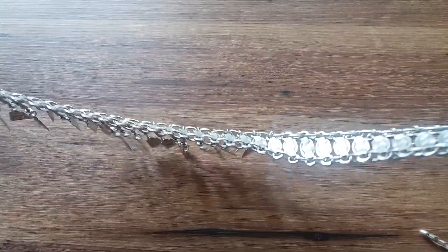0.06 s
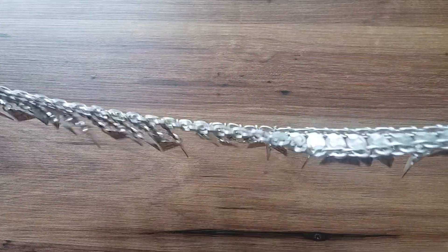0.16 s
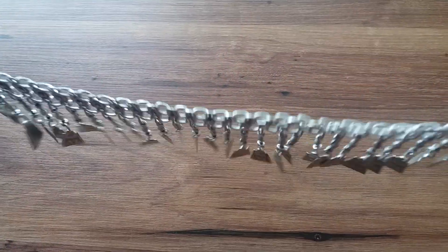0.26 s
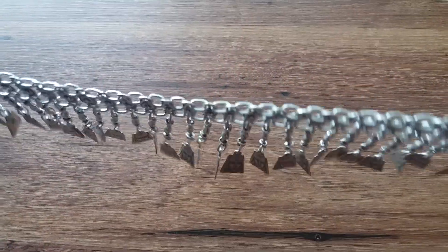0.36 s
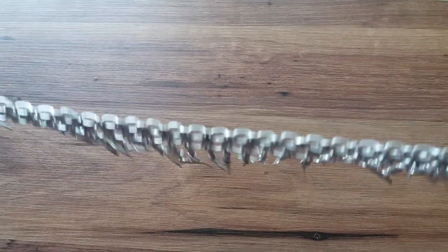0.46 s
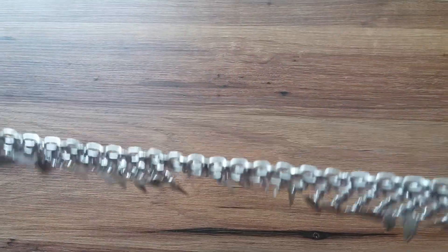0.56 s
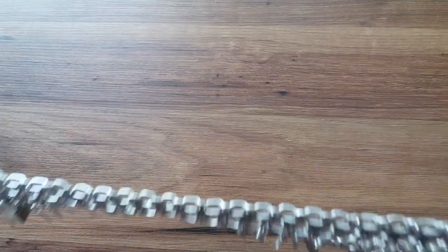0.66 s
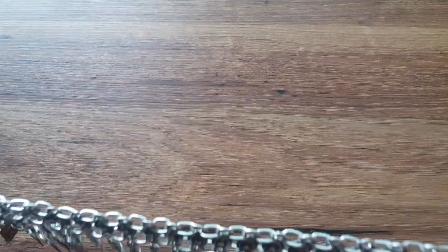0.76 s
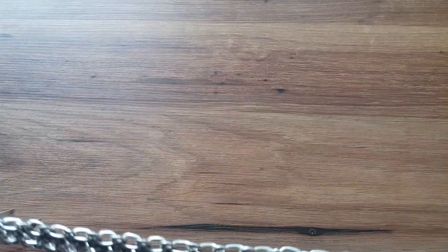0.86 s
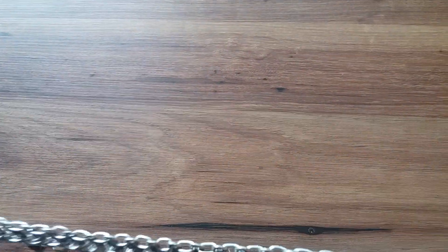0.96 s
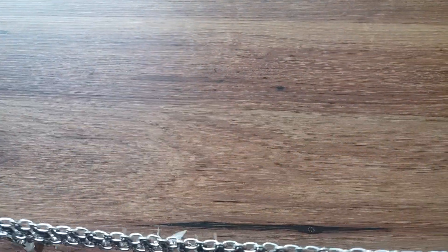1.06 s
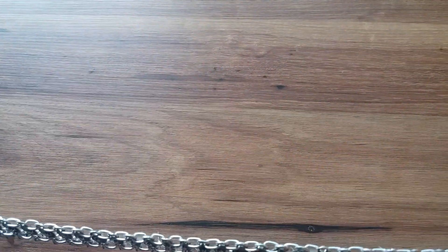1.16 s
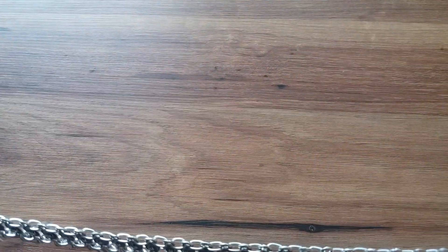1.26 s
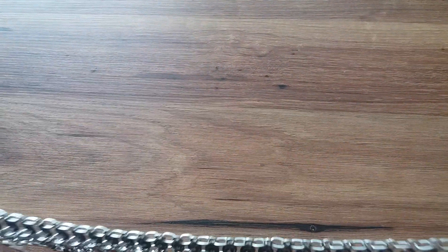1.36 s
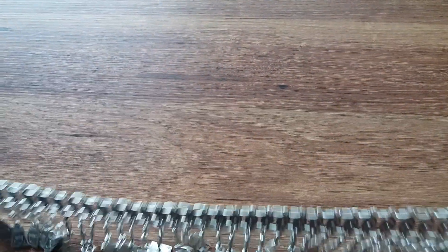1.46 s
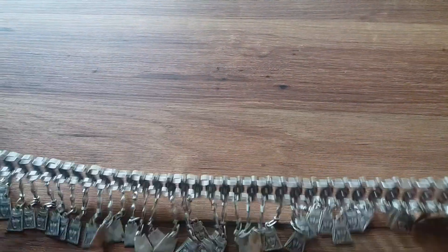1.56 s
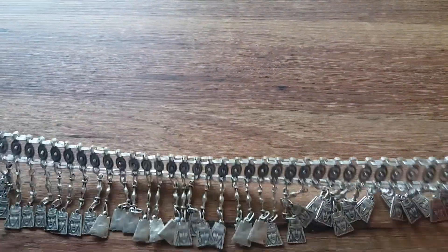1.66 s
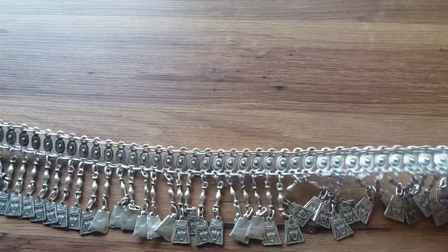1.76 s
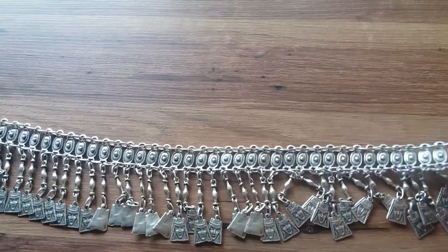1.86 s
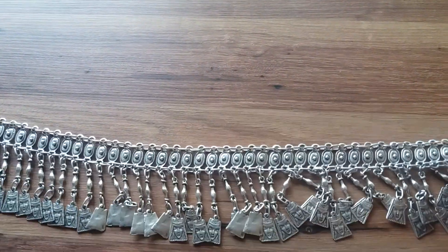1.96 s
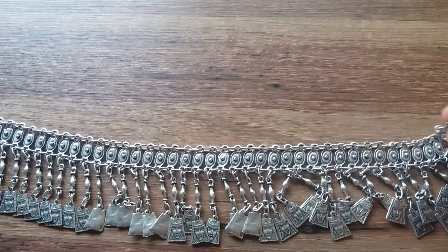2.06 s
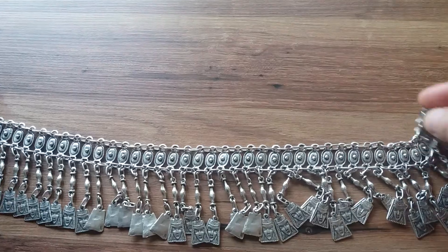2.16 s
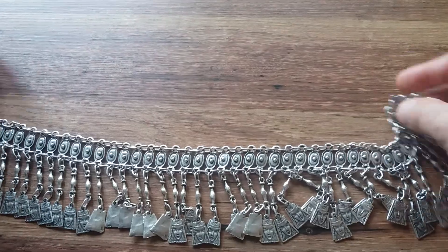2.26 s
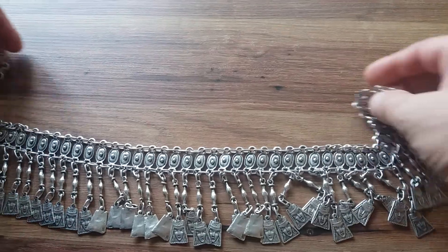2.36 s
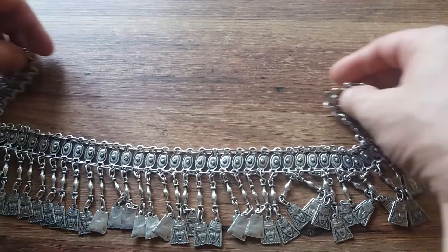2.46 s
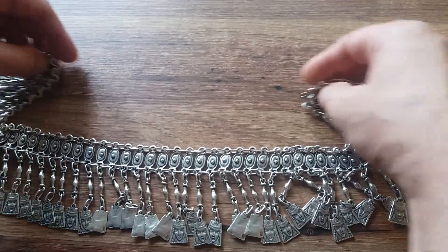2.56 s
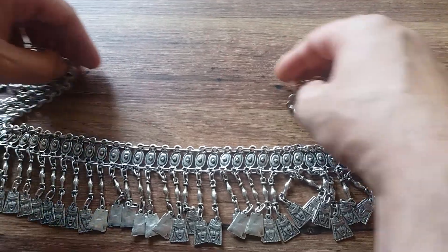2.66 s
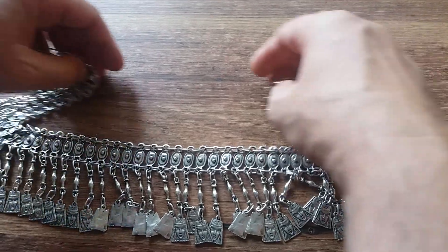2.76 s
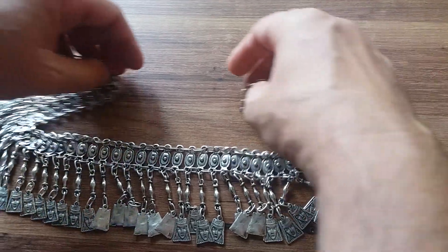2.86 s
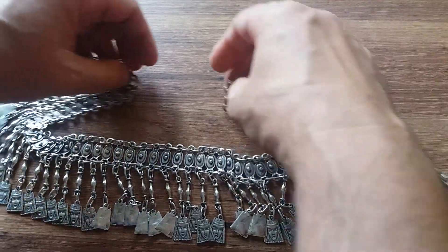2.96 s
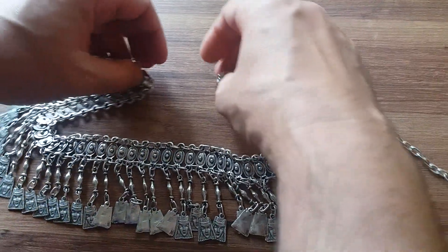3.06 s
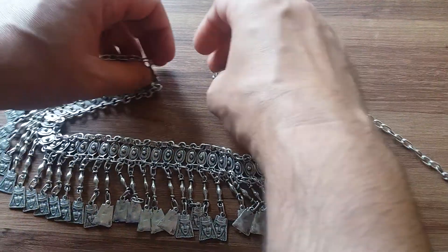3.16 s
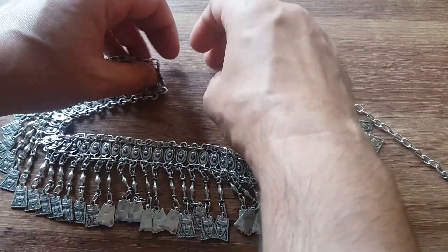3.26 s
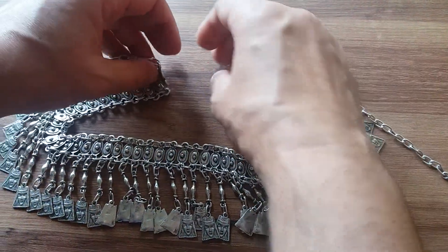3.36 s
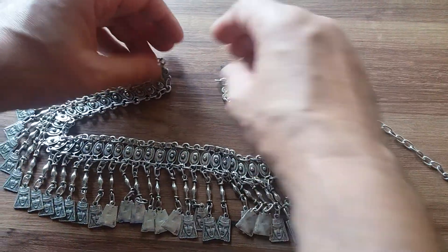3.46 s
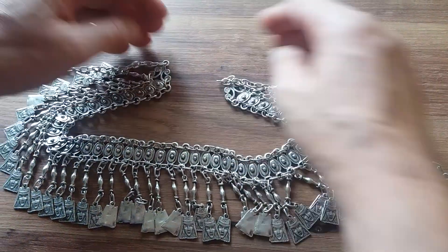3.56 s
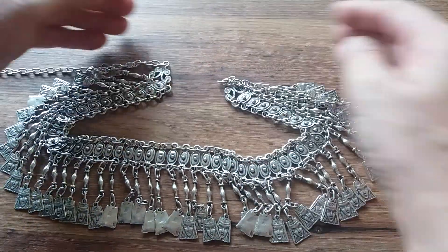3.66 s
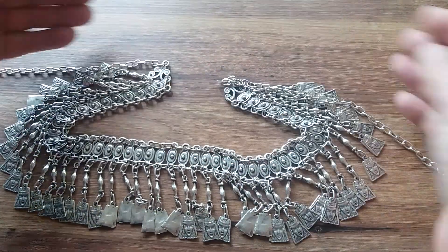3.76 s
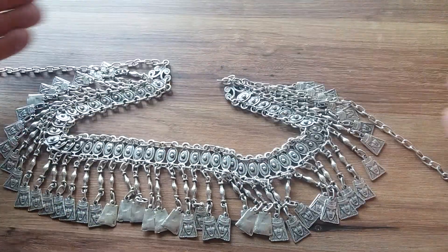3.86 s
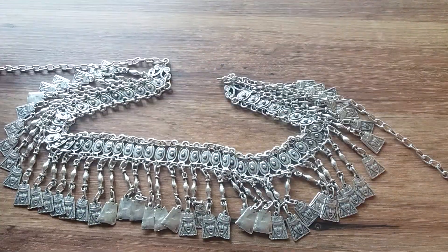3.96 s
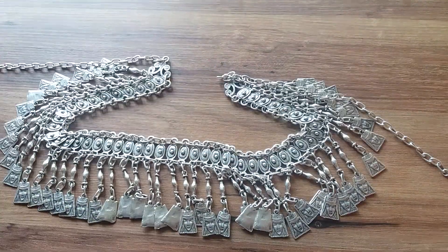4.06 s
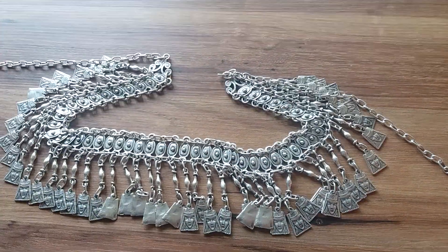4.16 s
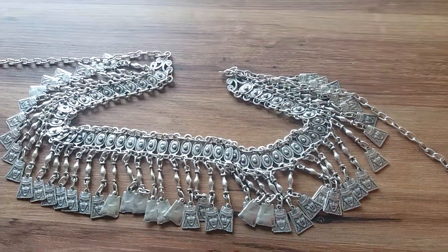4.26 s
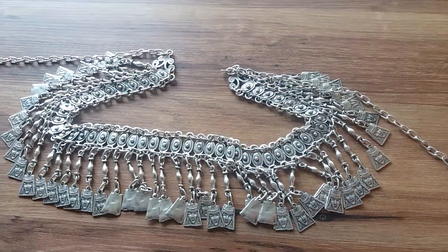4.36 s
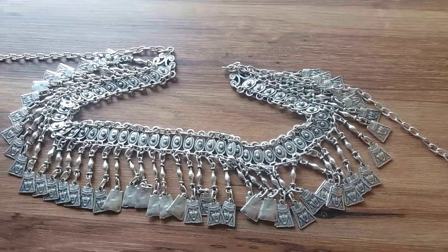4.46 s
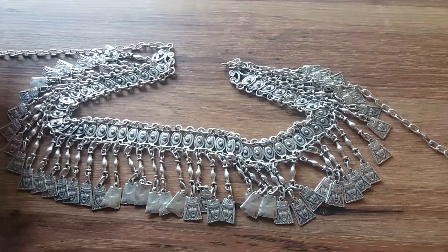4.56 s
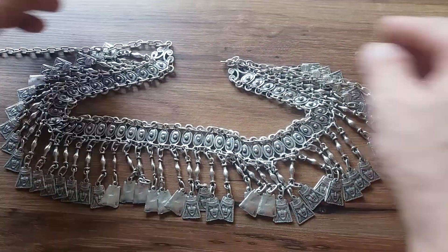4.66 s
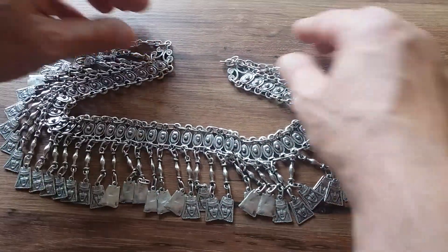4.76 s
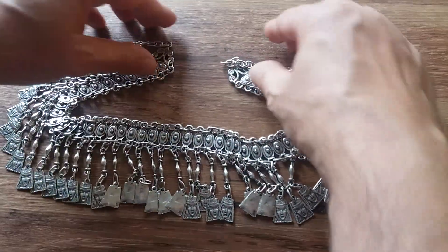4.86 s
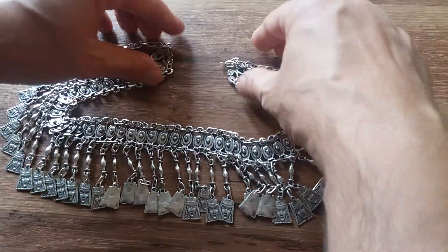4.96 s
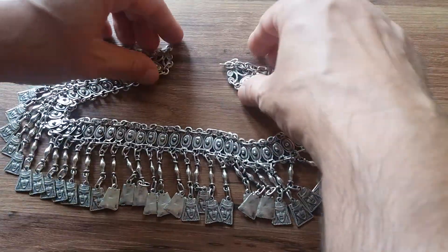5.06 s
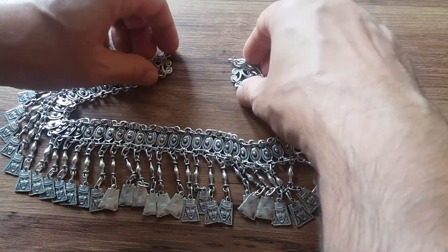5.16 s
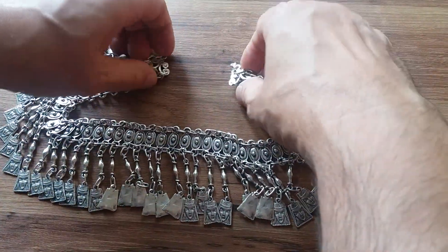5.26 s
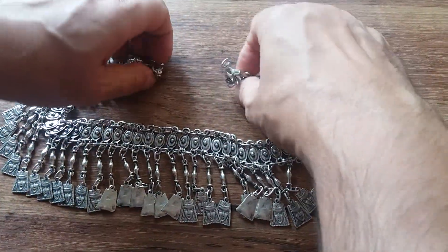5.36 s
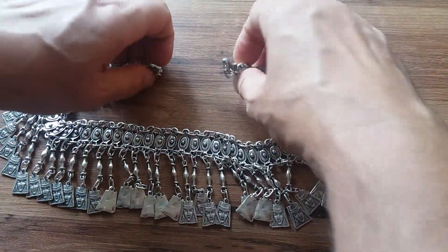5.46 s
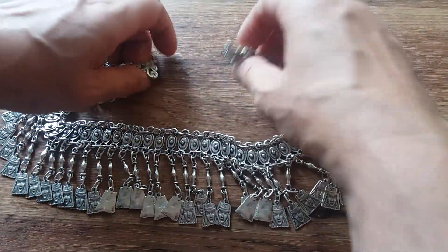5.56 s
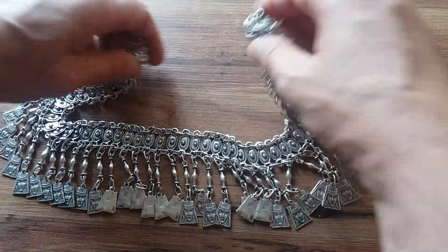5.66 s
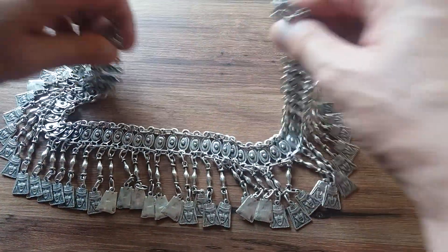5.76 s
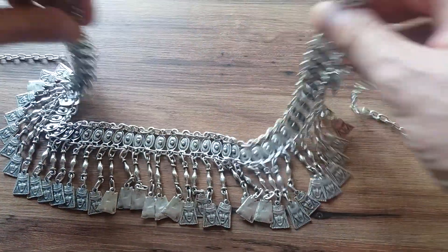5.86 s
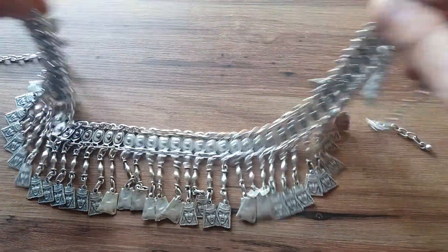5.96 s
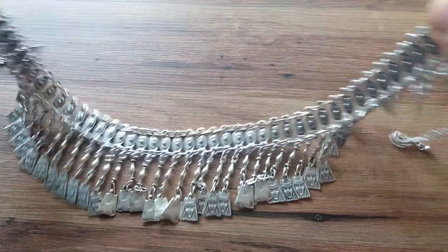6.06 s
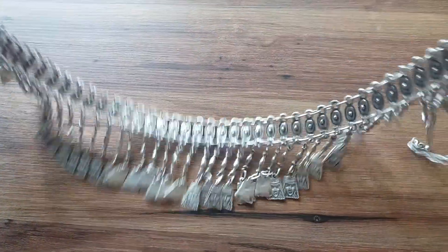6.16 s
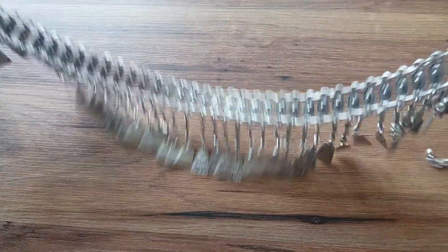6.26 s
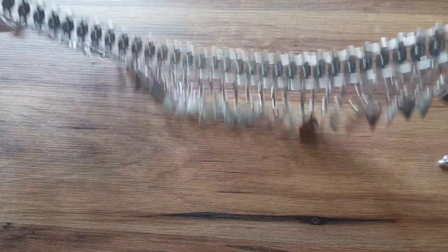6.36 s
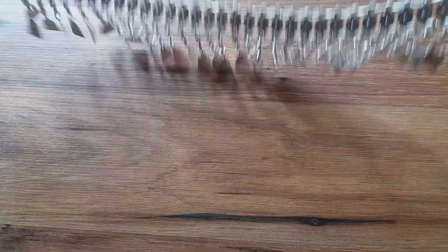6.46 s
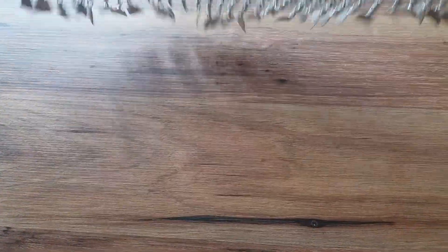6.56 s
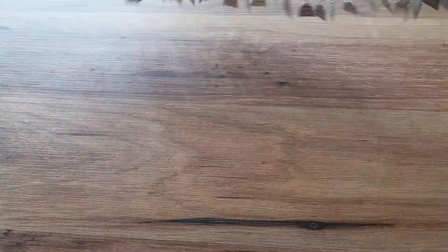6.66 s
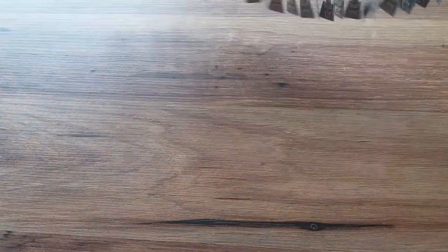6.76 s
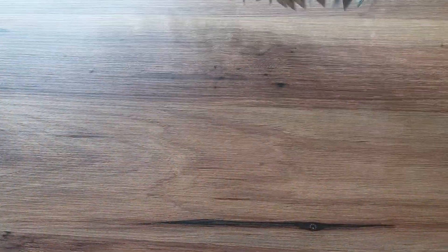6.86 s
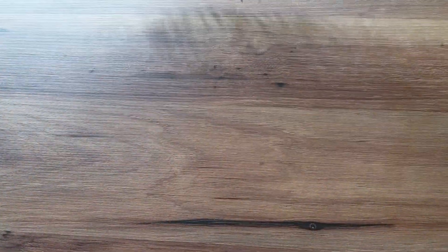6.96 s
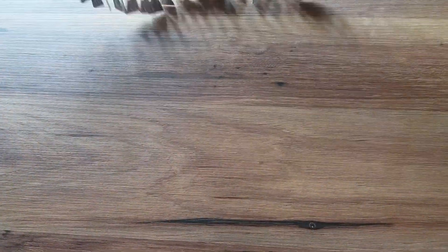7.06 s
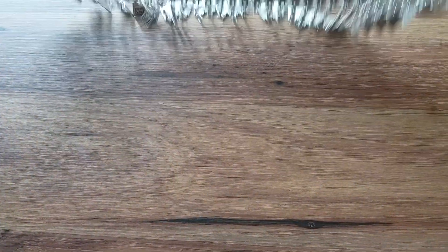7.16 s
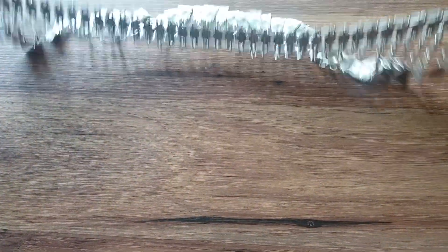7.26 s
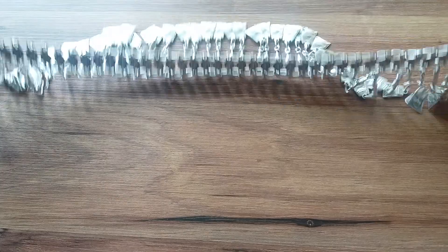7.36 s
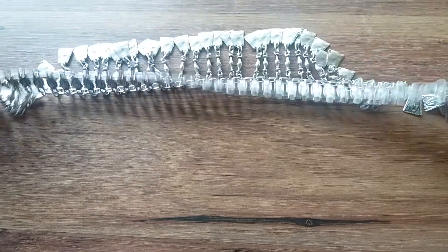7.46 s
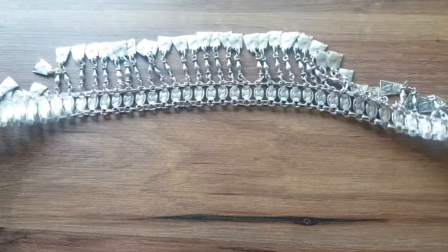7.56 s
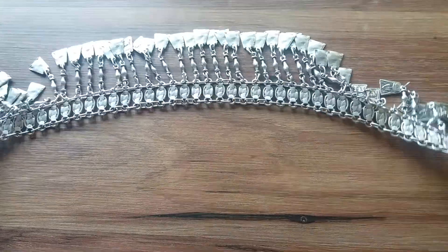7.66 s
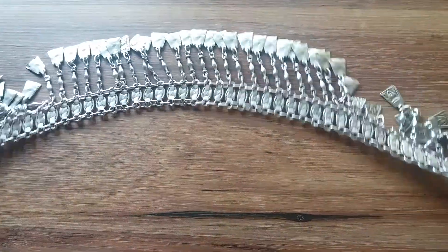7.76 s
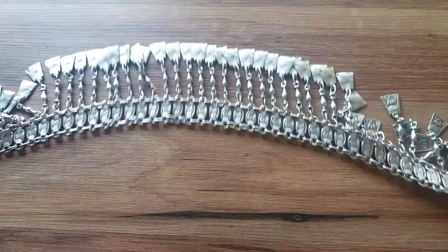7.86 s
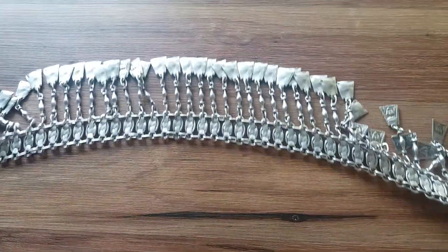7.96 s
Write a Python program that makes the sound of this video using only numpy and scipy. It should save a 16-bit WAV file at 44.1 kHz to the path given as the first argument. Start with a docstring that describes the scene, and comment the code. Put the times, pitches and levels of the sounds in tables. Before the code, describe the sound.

A quiet room with low distant traffic rumble and a faint wavering low hum; metal sounds are close and dry, with a short diffuse room tail. A brief light rattle opens, with thin high charm pings up to 0.8 s; a chain whirrs softly from 0.5 s and slows to separate ticks and small clacks around 1.0 s. At 1.5 s the belt lands with a hard clack and a dense bright jingle, renewed near 1.9 and 2.0 s, fading with dull table knocks. Softer shuffling swells from 2.5 to 3.7 s, with clacks near 2.9, 3.3 and 3.6. Near quiet until 5.0, then small clinks, a soft dull scuff at 5.75, and a jingle rising to 6.4. Quick chain ticks run 6.7-7.05 s. A heavy end lands at 7.1 with a hollow rattle, and crowded loud clacks and clatter continue from 7.3, easing slightly by 8.0.

```python
"""Dense showers of tiny dry clicks, brief very high ringing, hard clacks and a run of chain ticks in a quiet room:
a metal belt hung with small charms is lowered, folded, lifted and dropped on a wooden table.
Links, charms and chain are damped sines, or pulses and chance contacts through the resonances of wood and metal.
The room rumbles with distant traffic (shaped noise), hums (a wavering sine) and answers with diffuse tails."""
import sys
import numpy as np
from scipy import signal
from scipy.fft import rfft, irfft, next_fast_len
from scipy.io import wavfile
from scipy.ndimage import map_coordinates

SR = 44100
rng = np.random.default_rng(int(sys.argv[2]) if len(sys.argv) > 2 else 0)


def waveform_to_disk(signal):
    """Save audio, clipped to [-1, 1], as 16-bit WAV at the path in sys.argv[1]."""
    frames = np.transpose(np.atleast_2d(signal))
    scaled = np.clip(frames, -1, 1) * 32767
    samples = np.round(scaled).astype(np.int16)
    wavfile.write(sys.argv[1], SR, samples)


N = 353682
TIME_S = np.arange(N) / SR

# colour of metal on wood at the microphone: [f/Hz, relative level/dB]
WOOD_COLOUR = [(1500, -30.5), (2250, -11.5), (2750, -2.5), (3150, 3), (3650, -0.5), (4600, -1.5),
               (5600, -5.5), (6800, -15.5), (8600, -24), (11500, -31.5), (15800, -45)]
# hollow tones of the table top: [f/Hz, width/Hz, relative level/dB]
TABLE_MODES = [(1795, 580, 0), (2280, 300, 0)]


def amp(db):
    """Amplitude factor of a level in dB."""
    return 10 ** (np.asarray(db) / 20)


def unit(x):
    """x scaled to rms 1."""
    return x / np.sqrt(np.mean(x ** 2) + 1e-20)


def along(points, hz):
    """(Hz, value) points interpolated on a log frequency axis."""
    point_hz, value = np.transpose(points)
    return np.interp(np.log(hz + 1), np.log(point_hz + 1), value)


def curves(rows):
    """One value per sample for each column after the time."""
    s, *columns = np.transpose(rows)
    return [np.interp(TIME_S, s, column) for column in columns]


def wobble(rate_hz):
    """Smooth random curve, rate_hz knots a second."""
    knots = rng.standard_normal(int(N * rate_hz / SR) + 4)
    return map_coordinates(knots, [np.arange(N) * rate_hz / SR])


def filtered(x, response):
    """x times a response (real or complex) of frequency in Hz."""
    size = next_fast_len(N + SR // 2)
    return irfft(rfft(x, size) * response(np.fft.rfftfreq(size, 1 / SR)), size)[:N]


def causal(points):
    """Minimum-phase response with these (Hz, dB) gains: it starts at the blow."""
    def response(hz):
        cepstrum = irfft(np.log(amp(along(points, hz))))
        half = len(cepstrum) // 2
        cepstrum[1:half] *= 2
        cepstrum[half + 1:] = 0
        return np.exp(rfft(cepstrum))
    return response


def modes(table):
    """Sum of (Hz, width Hz, dB) resonances with steep skirts."""
    def response(f):
        return sum(amp(db) * (1j * f * width / (hz * hz - f * f + 1j * f * width)) ** 2
                   for hz, width, db in table)
    return response


def impulse():
    """One unit sample near the start, for finding the peak of a response."""
    return np.arange(N) == 99


def taps(s, size):
    """Single-sample pushes."""
    return np.bincount((s * SR).astype(int), size, N)[:N]


def rings(s, gain, hz, t60_s, rise_s, size, hold_s=0):
    """One damped sine per start time, size samples long; it may hold before it dies."""
    k = np.arange(size)
    t = k / SR
    decay = amp(-60 * np.maximum(t - hold_s, 0) / t60_s[:, None])
    attack = 1 - np.exp(-t / rise_s)
    wave = gain[:, None] * np.sin(2 * np.pi * hz[:, None] * t) * decay * attack
    at = (np.round(s * SR).astype(int)[:, None] + k).ravel()
    return np.bincount(at, wave.ravel(), N + size)[:N]


def contacts(s, gain, cycles, count):
    """Each contact sets count chance modes going together; wood and microphone colour them."""
    u = rng.random((len(s), count, 2))
    hz = 1500 * 10 ** u[..., 0]
    # modes even in octaves lasting a set number of cycles: size grows with pitch for an even spectrum
    size = gain[:, None] * amp(5 * u[..., 1]) * hz / 4000
    t60_s = cycles / hz
    raw = rings(np.repeat(s, count), size.ravel(), hz.ravel(), t60_s.ravel(), rise_s=5e-5, size=180)
    return filtered(raw, causal(WOOD_COLOUR))


def snaps(s, db, soft_hz):
    """Hard blows at a set peak: a push through metal-on-wood colour, rounded by the contact time."""
    def colour(hz):
        return causal(WOOD_COLOUR)(hz) / (1 + 1j * hz / soft_hz) ** 2
    peak = np.abs(signal.hilbert(filtered(impulse(), colour)[:4096])).max()
    return filtered(taps(s + 0.00055, amp(db) / peak), colour)


def shower(count, spread_db):
    """Chance times in s and sizes of many small events."""
    s = rng.random(count) * (N - 1) / SR
    return s, amp(spread_db * np.clip(rng.standard_normal(count), -2, 2))


def dying(start_s, db, t60_s):
    """Gain that starts at once and dies exponentially."""
    t = TIME_S - start_s
    return (t > 0) * amp(db - 60 * np.abs(t) / t60_s)


def room_tone():
    """Rumble and hiss: noise with a falling spectrum and a slightly wavering level."""
    # spectrum: [f/Hz, relative level/dB]
    air_colour = [(30, -41.5), (59, -8.5), (81, -8.5), (117, -13), (149, -2.5), (203, -2), (226, -7.5),
                  (362, -12), (402, -18), (1090, -17.5), (1750, -27.5), (5120, -47), (15800, -42.5)]
    air = unit(filtered(rng.standard_normal(N), lambda f: amp(along(air_colour, f))))
    return amp(-49 + 0.1 * wobble(2.06)) * air


def hum():
    """A sine whose pitch and level waver about slow curves."""
    # course: [t/s, f/Hz, rms level/dB]
    hum_course = [(0, 198.7, -60.5), (.9, 198.5, -45), (2, 200.1, -44.5), (2.4, 203, -53.5),
                  (5.2, 199.5, -58.5), (8.02, 197.4, -52)]
    hz, db = curves(hum_course)
    level = np.sqrt(2) * amp(db + 1.4 * wobble(5.4))
    return level * np.sin(2 * np.pi * np.cumsum(hz + 3 * wobble(8)) / SR)


def effort():
    """Clatter, ring and drumming gains: moves and jolts rise, hold and die; their powers add."""
    # handling of the belt, swung, brushed, dropped, pushed, gathered and lifted:
    # [t at full strength/s, build-up/s, hold/s, dying/s, clatter/dB, charm ring/dB, table drumming/dB]
    moves = [(0.123, 0.28, 0.0057, 0.016, -35.5, -66, -53), (0.155, .05, 0.15, 0.17, -51.5, -66.5, -61),
             (0.987, 0.15, 0.0098, 0.15, -63.5, -80, -52), (0.5, .1, 0.99, 0.07, -59, -71, -65),
             (1.333, 0.018, 0.023, 0.083, -48, -83, -44), (1.486, 0.00069, 0.13, 0.46, -22, -41, -39.5),
             (2.502, 0.87, 0.06, 0.58, -33, -67.5, -49.5), (2.918, 0.26, 0.078, 0.4, -33.5, -69, -49.5),
             (5.56, 0.34, 0.46, 0.53, -40.5, -78, -49), (6.363, 0.46, .17, 0.024, -28, -49, -41),
             (6.597, 0.056, 0.43, 0.11, -50.5, -64.5, -61), (7.121, .002, 0.04, 0.68, -25, -62, -33),
             (7.333, 0.18, 0.18, 0.22, -23.5, -46, -69.5), (7.932, 0.47, 0.016, 0.37, -29.5, -57.5, -46)]
    # short shakes as fingers nudge the links: [t at full strength/s, build-up/s, clatter/dB, charm ring/dB]
    nudges = [(1.62, .04, -25.5, -43.5), (1.919, 0.072, -23.5, -45), (2.02, 0.04, -28, -64),
              (3.262, 0.008, -37, -66), (3.303, 0.012, -40, -64), (3.452, 0.011, -38, -67),
              (3.61, 0.026, -33, -54.5), (5.086, 0.056, -38.5, -74), (5.201, 0.066, -36.5, -75),
              (5.281, 0.026, -39, -77), (5.35, 0.019, -41.5, -79), (5.405, 0.013, -31.5, -49.5),
              (7.39, .01, -22, -55), (7.49, 0.03, -25.5, -57), (7.611, 0.052, -24.5, -41)]
    hold_s, dying_s, drum_db = 0.0048, 0.091, -22  # of each nudge; drumming relative to its clatter
    step_db = 20  # lost one build-up time before, or one dying time after, full strength
    jolts = [(s, build, hold_s, dying_s, db, ring, db + drum_db) for s, build, db, ring in nudges]
    s, build, hold, fade, *levels = np.array(moves + jolts).T[..., None]
    t = np.arange(0, N / SR + .002, .0005)
    before = (np.maximum(s - t, 0) / build) ** 2
    after = np.maximum(t - s - hold, 0) / fade
    shape_db = -step_db * (before + after)
    gains = [np.sqrt((amp(db + shape_db) ** 2).sum(axis=0)) for db in levels]
    return [np.interp(TIME_S, t, gain) for gain in gains]


def link_clatter():
    """Dense chance contacts of links on wood, rms 1."""
    s, size = shower(count=26000, spread_db=4.2)
    return unit(contacts(s, size, cycles=33.0, count=2))


def strikes():
    """Sparse chance blows of whole charms on wood, brighter than the links, rms 1."""
    s, size = shower(count=700, spread_db=0.5)
    blows = contacts(s, size, cycles=20.5, count=8)
    return unit(filtered(blows, lambda hz: 1j * hz / (1j * hz + 6000)))


def charm_ring():
    """Flat charms ring briefly at pitches scattered about a few mode families, rms 1."""
    # mode families: [f/Hz, spread to either side/Hz, relative level/dB]
    charm_modes = [(11000, 290, -0.5), (13300, 300, 3.5), (14270, 350, 3.5), (15230, 310, -1.5)]
    s, size = shower(count=5000, spread_db=5.5)
    u = rng.random((len(s), 2))
    family = (u[:, 0] * len(charm_modes)).astype(int)
    hz, spread_hz, db = np.array(charm_modes)[family].T
    pitch_hz = hz + spread_hz * (2 * u[:, 1] - 1)
    return unit(rings(s, size * amp(db), pitch_hz, np.full(len(s), 0.016), rise_s=3e-4, size=750))


def table_hollow(pushes):
    """Chance pushes excite the table-top modes; further back only the upper one sounds."""
    further_back_s = (5, 6.6)  # the folded belt lies further back
    front = unit(filtered(pushes, modes(TABLE_MODES)))
    back = unit(filtered(pushes, modes(TABLE_MODES[1:])))
    return np.where(np.digitize(TIME_S, further_back_s) == 1, back, front)


def buckle(pushes):
    """The heavy end lands and rattles out: pushes through one dying resonance."""
    rattle = unit(filtered(pushes, modes([(1523.5, 118.5, 0)])))  # f/Hz, width/Hz, dB
    return dying(7.118, db=-29.5, t60_s=0.67) * rattle


def belt():
    """Links, charms and table sound together as the handling drives them."""
    clump_db = 0.61 * wobble(30)  # links move in clumps
    s, size = shower(count=6000, spread_db=4.5)
    pushes = taps(s, size * rng.choice([-1, 1], len(s)))
    rattling, swinging, drumming = effort()
    hard = amp(-4.5) * (rattling / rattling.max()) ** .6  # harder handling, more pronounced strikes
    clatter = rattling * (link_clatter() + hard * strikes())
    hollow = drumming * table_hollow(pushes)
    return amp(clump_db) * (clatter + swinging * charm_ring() + hollow + buckle(pushes))


def pings():
    """A charm struck in the air: a quick first drop, then a thin long ring."""
    # single charms: [t/s, level/dB, f/Hz]
    charm_hits = [(0.1251, -46, 11300), (0.391, -37.5, 11000), (0.5698, -43, 10900), (0.793, -53, 11160),
                  (2.008, -30.5, 10800), (6.574, -34.5, 15500), (6.6168, -41, 13300), (6.7732, -39, 14400),
                  (7.0622, -41, 14100)]
    s, db, hz = np.transpose(charm_hits)
    first = rings(s, amp(db), hz, np.full(len(s), 0.012), rise_s=0.00025, size=2000)
    tail = rings(s, amp(db - 15), hz, np.full(len(s), 0.12), rise_s=0.00018, size=9000)
    return first + tail


def chain():
    """Every link knocks the same edge: a whirr while the chain runs, single ticks as it slows."""
    # fast run: [t/s, link rate/Hz, level/dB]
    slide = [(.5, 153, -64), (.75, 144, -54), (.88, 120, -48), (.93, 88, -48)]
    # links dropping one by one over the edge: [t/s, relative level/dB]
    link_drops = [(.9341, -29), (.9521, -28), (.9726, -28), (6.6705, -33), (6.6783, -28), (6.6862, -28),
                  (6.6962, -25), (6.706, -27), (6.7137, -27), (6.7242, -26), (6.7347, -26), (6.7455, -30),
                  (6.756, -31), (6.765, -31), (6.7771, -31), (6.789, -29), (6.7995, -31), (6.809, -32),
                  (6.821, -27), (6.8384, -26), (6.8509, -26), (6.8674, -25), (6.8833, -25), (6.8973, -25),
                  (6.9153, -28), (6.926, -30), (6.9457, -29), (6.9577, -25), (6.9751, -23), (6.9951, -23),
                  (7.029, -27), (7.04, -28), (7.0494, -31)]
    # modes of the edge under the chain: [f/Hz, width/Hz, relative level/dB]
    edge_modes = [(1775, 150, -14), (2590, 130, -15), (3040, 160, 0), (3610, 180, -8), (4060, 200, -8),
                  (4540, 170, -10), (5300, 150, -19)]
    # pull on the chain, moving the edge's lower tones: [t/s, frequency factor]
    pull = [(1.25, 1.0), (6.68, 1.1), (6.77, 1.08), (6.82, 1.0)]
    rate_hz, db = curves(slide)
    links_passed = np.cumsum(rate_hz * (1 + 0.086 * wobble(90))) / SR
    run = np.diff(np.floor(links_passed), prepend=0) * amp(2.8 * rng.standard_normal(N))
    moving = np.abs(TIME_S - .7) < .25
    whirr = moving * amp(db) * unit(filtered(run, modes(edge_modes)))

    s, tick_db = np.transpose(link_drops)
    hz, _, mode_db = np.transpose(edge_modes)
    u = rng.standard_normal((len(s), len(hz), 2))
    factor = np.interp(s, *np.transpose(pull))[:, None] ** (hz < 4200)
    pitch_hz = factor * hz * (1 + .025 * u[..., 0])
    gain = amp(tick_db[:, None] + mode_db - 5 + 2.5 * u[..., 1])
    ring = rings(np.repeat(s, len(hz)), gain.ravel(), pitch_hz.ravel(), np.full(gain.size, .007),
                 rise_s=0.0003, size=600, hold_s=.0022)
    blow = snaps(s, tick_db - 14, soft_hz=9100)
    return ring + blow + whirr


def clacks():
    """Metal on wood: a hard blow, and three quick contacts whose chance modes die within some cycles."""
    # single clacks: [t/s, relative level/dB]
    clack_hits = [(1.0058, -18), (1.0253, -21), (1.0437, -26), (1.0604, -29), (1.0871, -21), (1.1071, -31),
                  (1.1764, -30), (1.1949, -36), (1.2433, -38), (1.4496, -32), (1.4863, -7), (1.8845, -12),
                  (1.9048, -8), (2.0126, -13), (2.074, -16), (2.1039, -16), (2.9041, -16), (3.2605, -9),
                  (3.2954, -21), (3.4199, -33), (3.4339, -26), (3.4553, -13), (3.4828, -20), (3.5805, -30),
                  (3.591, -16), (3.6024, -17), (3.6077, -14), (3.7302, -33), (5.0322, -31), (5.0791, -19),
                  (5.0926, -20), (5.1986, -24), (5.2709, -24), (5.3398, -23), (5.4049, -19), (5.4324, -17),
                  (5.7476, -22), (5.813, -15), (6.3081, -13), (7.2994, -9), (7.3219, -6), (7.3423, -5),
                  (7.359, -5), (7.4785, -7), (7.6766, -11), (7.3837, -7), (7.5523, -12), (7.5723, -9),
                  (7.593, -9), (7.626, -7), (7.634, -9), (7.7105, -13), (7.6027, -5), (7.6536, -8),
                  (7.698, -10), (7.886, -13), (7.919, -11)]
    s, db = np.transpose(clack_hits)
    contact_s = s[:, None] + .0045 * rng.random((len(s), 3))
    ring = contacts(contact_s.ravel(), np.repeat(amp(db - 16), 3), cycles=34, count=4)
    return snaps(s, db - 1, soft_hz=12000) + ring


def table_knocks():
    """Dull knocks: single pushes sound only the table-top modes."""
    # knocks: [t/s, peak level/dB]
    dull_hits = [(2.1268, -27), (2.4537, -24), (2.506, -32), (7.721, -25)]
    s, db = np.transpose(dull_hits)
    peak = np.abs(filtered(impulse(), modes(TABLE_MODES))).max()
    return filtered(taps(s, amp(db) / peak), modes(TABLE_MODES))


def bump():
    """A soft scuff far off: dull band-limited noise that starts at once and dies."""
    def dull(f):
        return f ** 2 / (f ** 2 + 350 ** 2) / (1 + (f / 2400) ** 4)
    return dying(5.758, db=-40.5, t60_s=0.56) * unit(filtered(rng.standard_normal(N), dull))


def walls(x, t60_s, count=7):
    """Short diffuse room answer: pieces sound from ever other places, so the noise tail varies."""
    t = np.arange(SR // 4) / SR
    tails = rng.standard_normal((count, len(t))) * amp(-60 * t / t60_s) * (t > .002)
    place = np.repeat(rng.integers(count, size=N // 400 + 1), 400)[:N]  # redrawn every 400 samples
    parts = x * (place == np.arange(count)[:, None])
    wet = signal.fftconvolve(parts, tails / np.linalg.norm(tails[0]), axes=1).sum(axis=0)[:N]
    return filtered(wet, lambda hz: hz > 1100)  # small metal pieces put no bass into the room


def scene():
    """Belt, charms and chain with their room answer, over the sounds of the room."""
    ticks = chain()
    metal = belt() + pings() + clacks() + table_knocks()
    # the chain is closer to the microphone, so it gets less of the room
    wet = amp(-7.5) * walls(metal + amp(-4) * ticks, t60_s=0.26)
    return (metal + ticks + wet + room_tone() + hum() + bump())[None]


def record(dry):
    """The microphone keeps nothing above its band limit."""
    top_hz = 15900
    return filtered(dry[0], lambda hz: hz < top_hz)[None]


dry = scene()
out = record(dry)
waveform_to_disk(out)
```